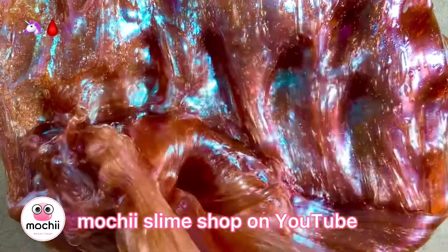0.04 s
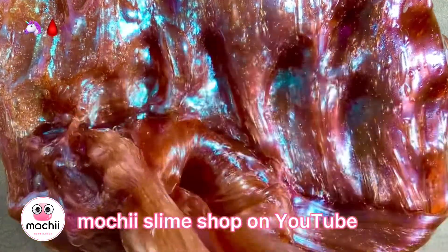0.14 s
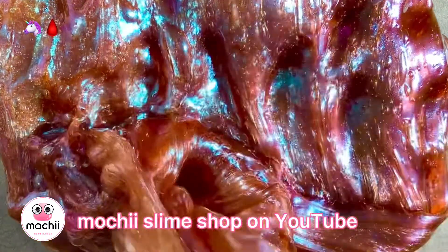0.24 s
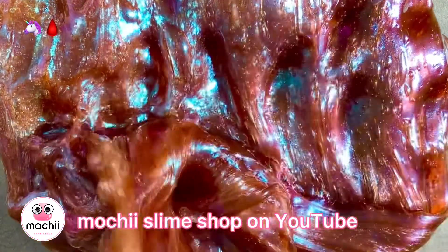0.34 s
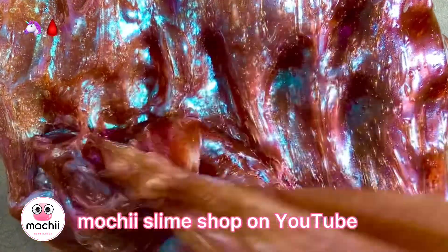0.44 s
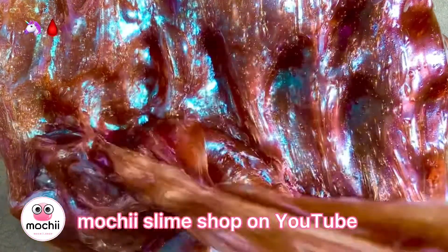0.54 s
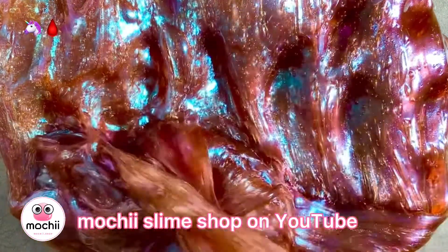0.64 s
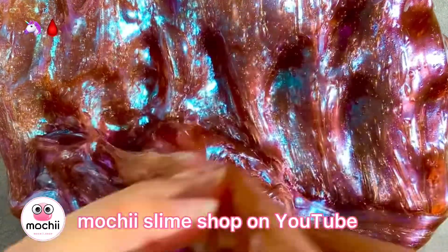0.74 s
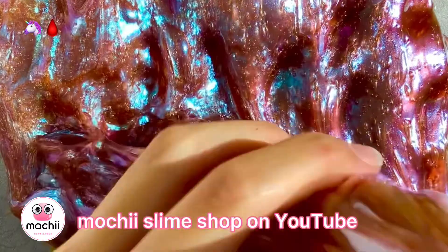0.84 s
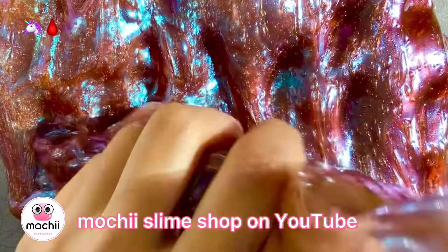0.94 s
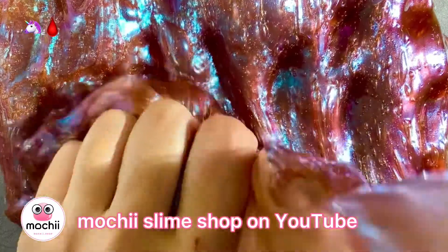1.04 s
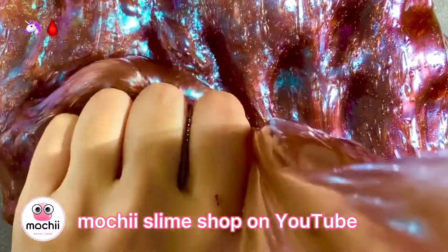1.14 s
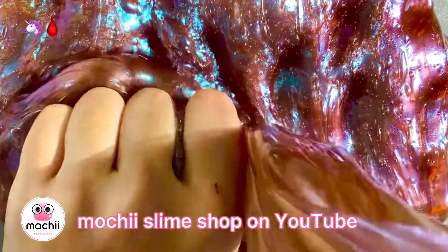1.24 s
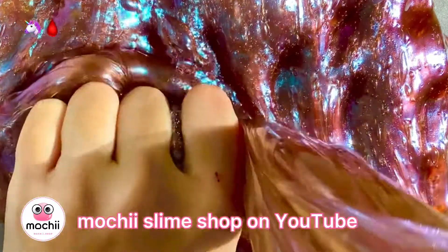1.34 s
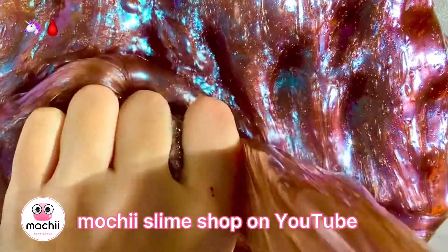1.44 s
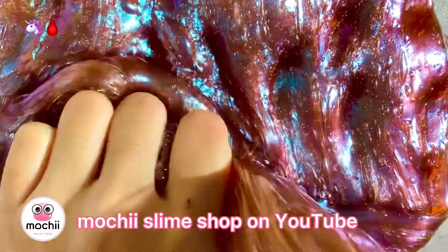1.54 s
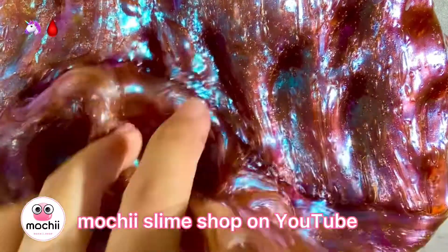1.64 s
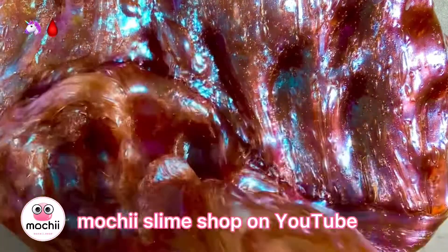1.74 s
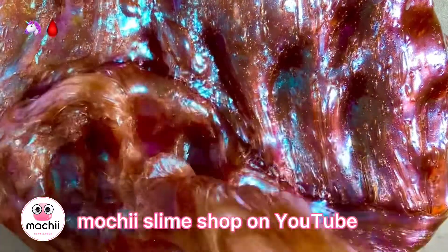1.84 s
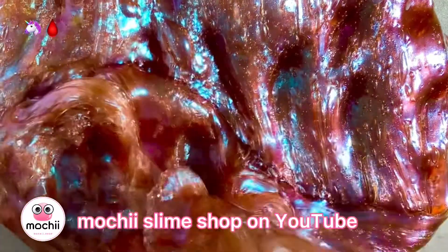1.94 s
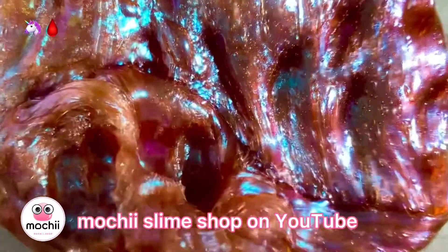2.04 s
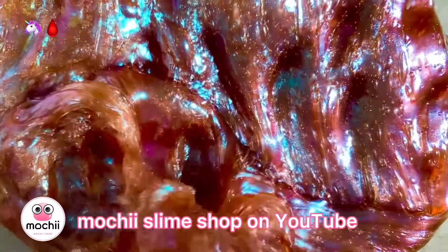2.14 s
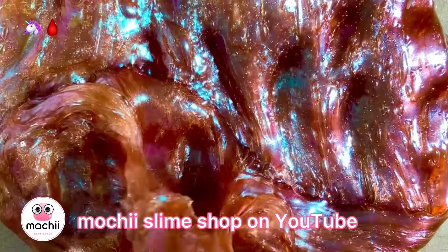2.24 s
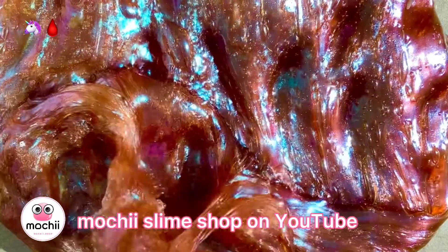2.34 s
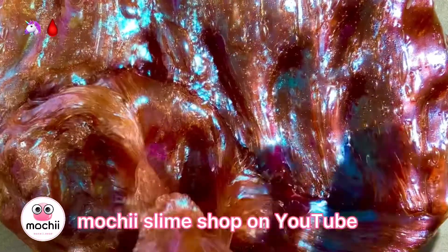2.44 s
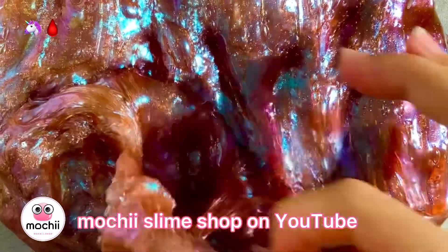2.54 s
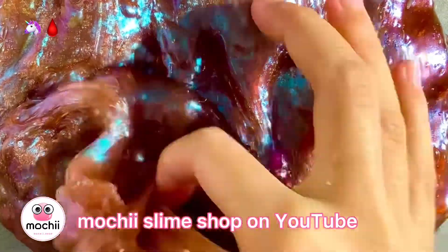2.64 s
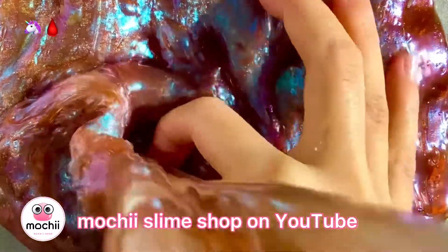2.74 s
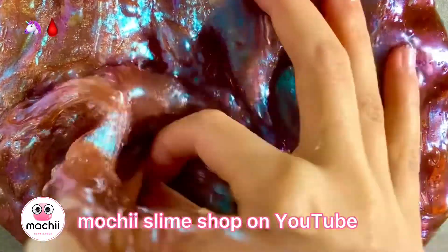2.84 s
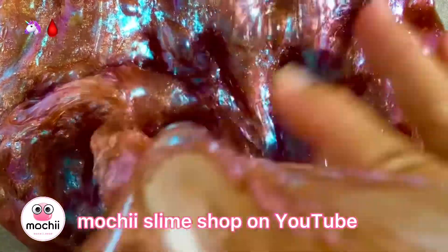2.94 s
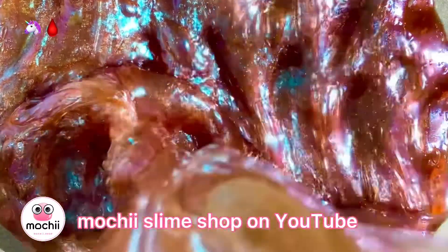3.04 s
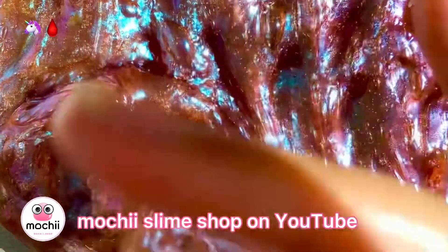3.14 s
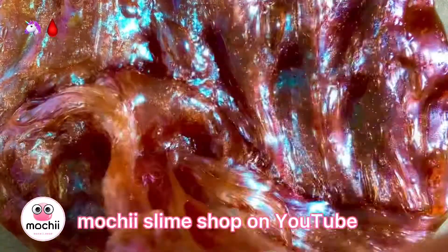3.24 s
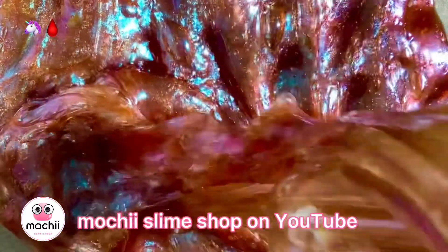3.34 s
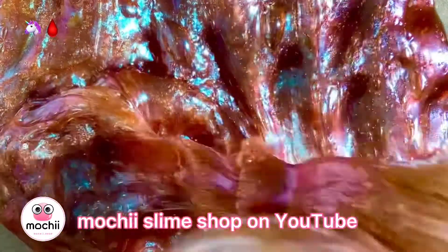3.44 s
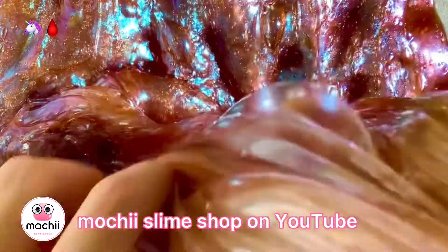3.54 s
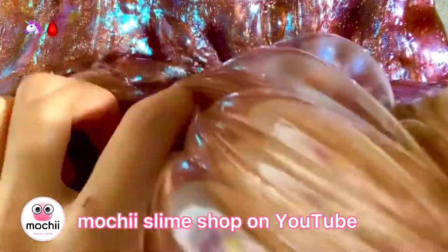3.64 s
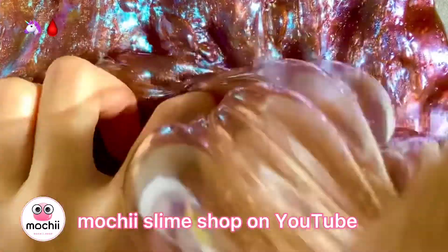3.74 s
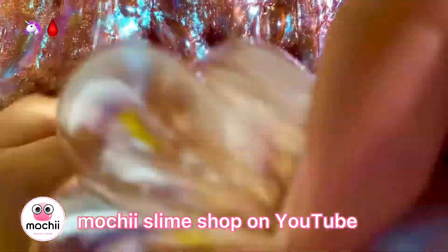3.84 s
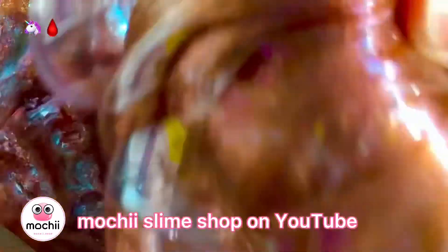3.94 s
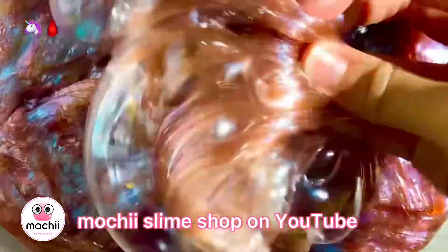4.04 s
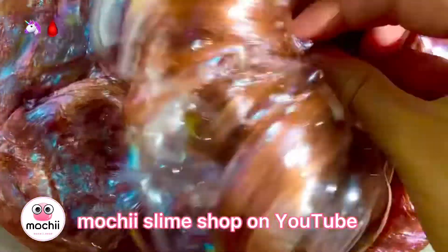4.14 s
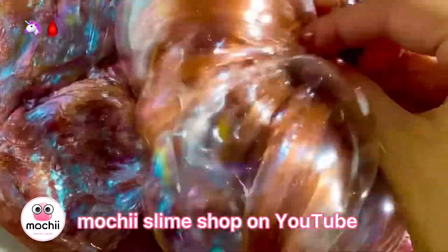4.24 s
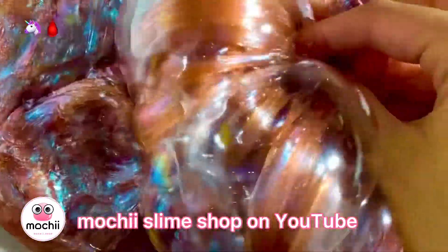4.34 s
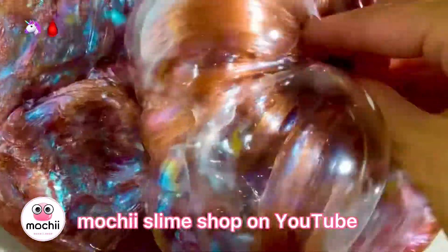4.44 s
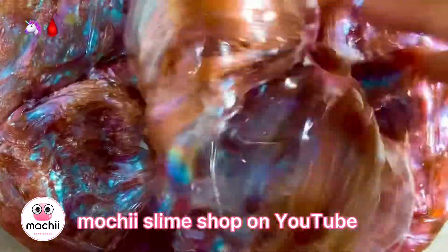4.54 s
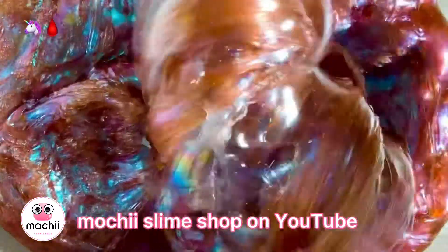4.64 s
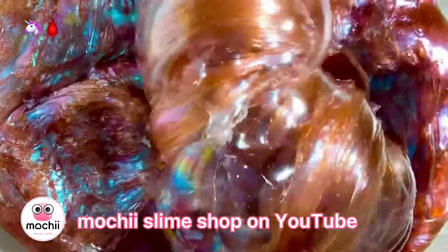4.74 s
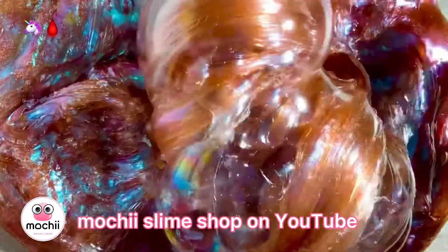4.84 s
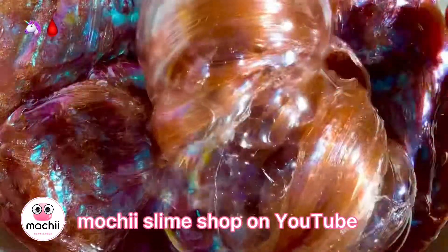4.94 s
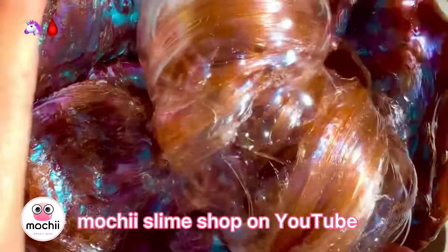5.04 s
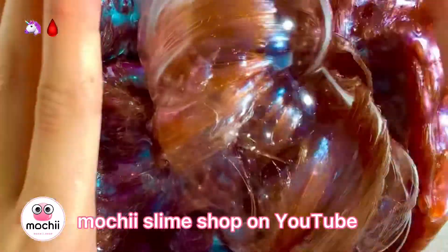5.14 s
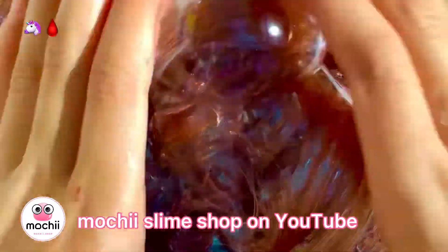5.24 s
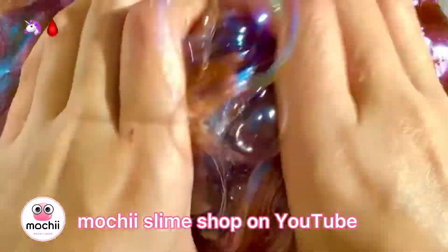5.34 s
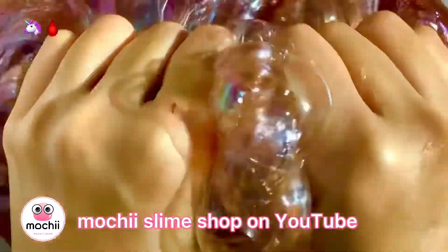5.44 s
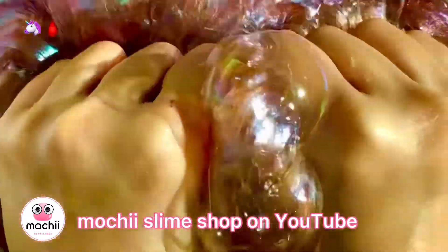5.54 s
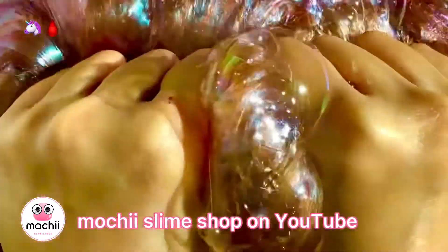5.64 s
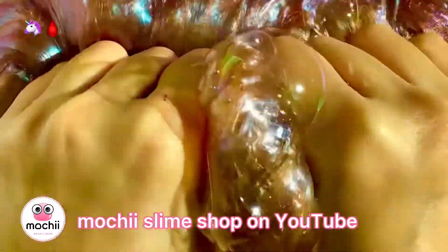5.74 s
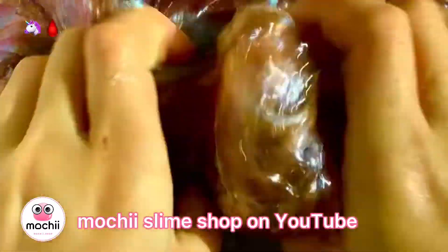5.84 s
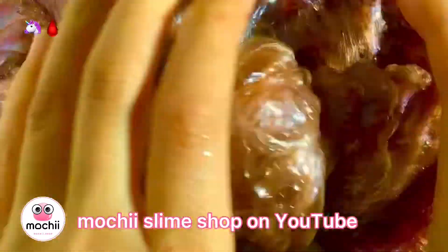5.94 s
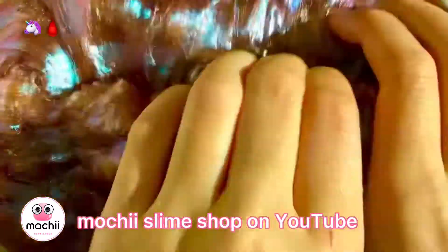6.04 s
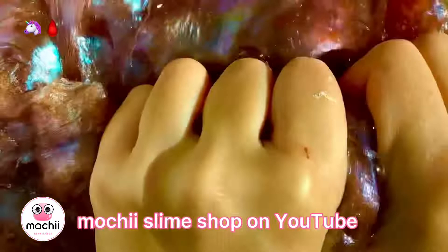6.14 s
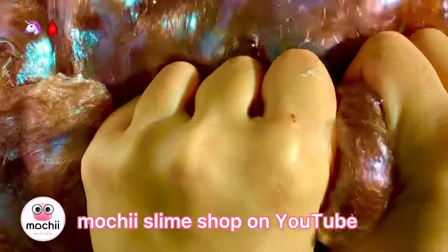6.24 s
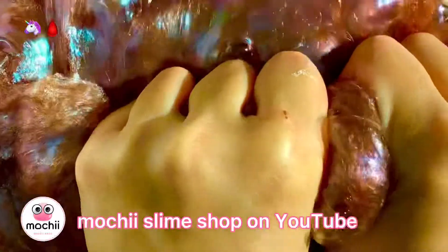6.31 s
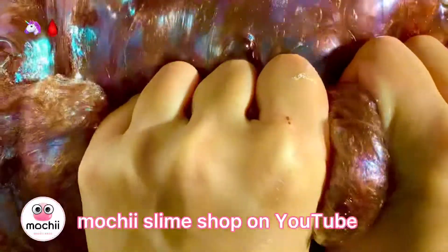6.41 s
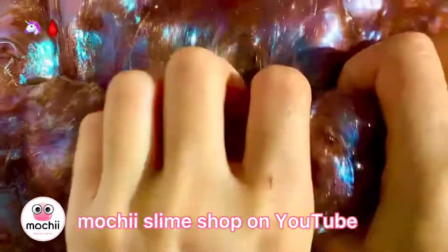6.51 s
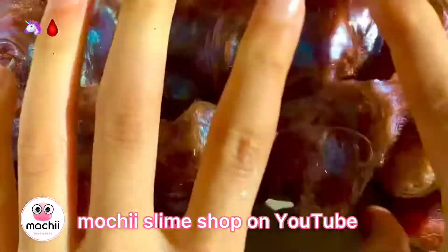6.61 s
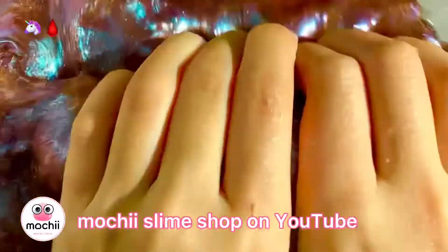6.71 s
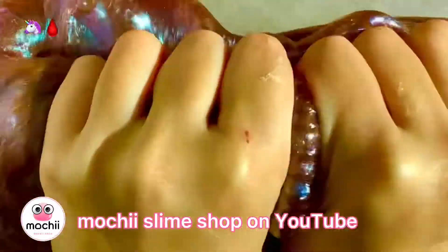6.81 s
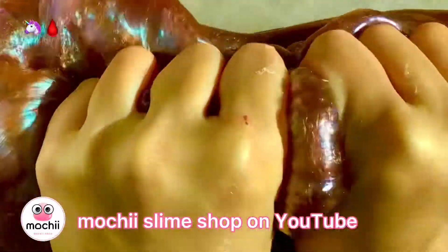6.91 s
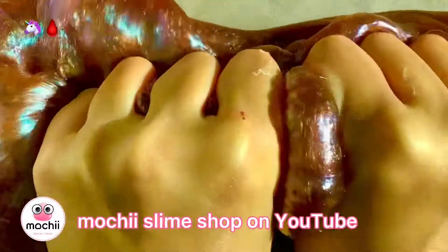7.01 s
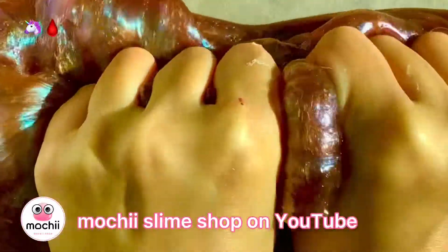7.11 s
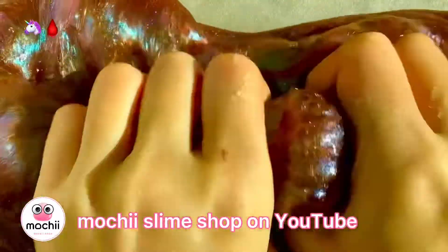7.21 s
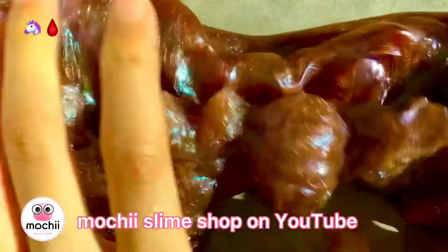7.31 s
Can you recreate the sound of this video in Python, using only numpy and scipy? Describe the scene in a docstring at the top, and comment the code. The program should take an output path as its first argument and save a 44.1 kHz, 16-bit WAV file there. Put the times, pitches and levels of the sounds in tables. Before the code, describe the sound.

Sticky slime full of trapped air is poked, stretched and pressed. Pops are short, bright and dry-edged with tiny wet rings; closing finger holes give deeper gulping plops. Sparse at first, the sounds gather midway and then erupt in three tight crackling bursts with squelch beneath. Close, detailed, centred sound with a very slight small-room reflection and low background hiss and rumble.

```python
"""Air pockets burst with short pops as hands press, poke and pull sticky slime in a quiet small room.
Each pop is a noisy snap with a quickly fading ring; holes left by fingers close with low, ringing plops.
Film peeling off skin is a crackle of tiny rings and noise that follows each press and pull.
Echoes, filtered noise for room hiss and a fuzzy hum surround it; both channels carry one microphone."""
import sys
import numpy as np
from scipy import signal
from scipy.fft import rfft, irfft
from scipy.io import wavfile
from scipy.ndimage import uniform_filter1d

SR = 44100
rng = np.random.default_rng(int(sys.argv[2]) if len(sys.argv) > 2 else 0)


def generate_wav(sig):
    """Save sig (samples, or channels by samples) to the path in sys.argv[1] as 16-bit PCM at SR."""
    pcm = np.round(np.clip(np.atleast_2d(sig).T, -1, 1) * 32767).astype(np.int16)
    wavfile.write(sys.argv[1], SR, pcm)


N = 325017  # length in samples


def gain_of(db):
    """Turns decibels into a gain."""
    return 10 ** (np.asarray(db) / 20)


def evened(x):
    """Scales to rms 1."""
    return x / np.sqrt(np.mean(x ** 2) + 1e-20)


def peaked(x):
    """Scales to peak 1."""
    return x / np.abs(x).max()


def smoothed_twice(x, size):
    """Takes a moving average twice, leaving only slow changes."""
    return uniform_filter1d(uniform_filter1d(x, size=size), size=size)


def colour(x, points):
    """Filters by a spectrum of (Hz, dB) points."""
    hz, db = np.transpose(points)
    at = np.fft.rfftfreq(len(x), 1 / SR)
    shape_db = np.interp(np.log(at + 1), np.log(hz + 1), db)
    return irfft(rfft(x) * gain_of(shape_db), len(x))


def add(mix, peak_s, sound):
    """Mixes a sound in with its peak at the given time."""
    part = mix[round(peak_s * SR) - np.abs(sound).argmax():][:len(sound)]
    part += sound[:len(part)]


def ring(hz, cycles, sag, rise):
    """A damped air pocket whose pitch sags to hz as the soft walls relax; fade and rise are in cycles."""
    u = np.arange(1, int(SR / hz * cycles * 6) + 8) * hz / SR  # time in cycles
    turns = u + sag * cycles * (1 - np.exp(-u / cycles))
    swell = 1 - np.exp(-(u / rise) ** 2)
    return peaked(np.sin(2 * np.pi * turns) * swell * np.exp(-u / cycles))


def pops():
    """The film creaks faintly and snaps; the opened pocket rings briefly and slumps with a falling gulp."""
    # bursting air pockets: (peak_s, ring_peak_db, ring_pitch_hz, snap_peak_db)
    pop_table = [(0.2027, -46, 6270, -17.5), (0.2408, -34, 4500, -25.5), (0.8115, -37.5, 4600, -21),
                 (0.9637, -39.5, 4000, -23.5), (1.0635, -28.5, 4830, -20), (1.1049, -33, 3020, -26),
                 (1.1188, -24.5, 2780, -16.5), (1.1224, -16, 2040, -10), (1.1419, -42, 2610, -16.5),
                 (1.1598, -29, 2700, -18), (1.2028, -23, 6000, -13.5), (1.2087, -9, 4940, -13),
                 (1.2442, -23.5, 4650, -21), (1.2676, -24.5, 5240, -17), (1.2884, -16, 4600, -11),
                 (1.4193, -31, 5100, -27), (1.5383, -34, 3295, -30), (1.5868, -32.5, 4040, -40),
                 (2.025, -31.5, 1720, -45.5), (2.6945, -35.0, 4570, -41), (2.7805, -31, 4330, -21.5),
                 (2.9354, -28, 3720, -27.0), (3.365, -36.5, 3880, -36.5), (3.5217, -24.5, 4300, -14),
                 (3.767, -33, 3450, -39.5), (3.7765, -35.5, 4280, -23), (3.7981, -21, 4910, -7.5),
                 (3.8626, -28.5, 5680, -24.0), (4.0504, -25.0, 3094, -24), (4.11, -37, 3430, -26.5),
                 (4.1348, -26, 2380, -40), (4.1387, -23.5, 2700, -17.5), (4.1427, -30, 3290, -21),
                 (4.1694, -25.5, 4630, -40.5), (4.1825, -4.5, 3105, -14), (4.243, -22, 4320, -15.5),
                 (4.9686, -37, 5700, -39), (5.0691, -38.5, 5750, -59), (5.3608, -21, 5180, -15),
                 (5.3648, -13, 3790, -21), (5.4007, -9, 2630, -19.0), (5.4055, -3.5, 3670, -16),
                 (5.4153, -15, 3840, -5.5), (5.4198, -11, 3820, -13), (5.437, -10, 3700, -13.5),
                 (5.4409, -13.5, 3640, -11), (5.4538, -13, 5200, -10), (5.4576, -15, 4200, -10),
                 (5.4636, -12, 4650, -1.5), (5.4683, -14, 5130, -13.5), (5.4847, -8.5, 3670, -10),
                 (5.4941, -14, 5240, -7), (5.5077, -28.5, 5700, -7.5), (5.5141, -27, 5300, -5),
                 (5.524, -20, 3480, -14), (5.5288, -9, 4930, -17), (5.547, -8.5, 5300, -5),
                 (5.5606, -16.5, 4830, -9), (5.5741, -15.5, 4380, -15), (5.5795, -11, 5700, 5),
                 (5.5947, -15, 5370, -7.0), (5.6144, -18.5, 5170, -1.5), (5.6279, -10, 4330, -3.5),
                 (5.6384, -7.5, 5530, -19), (5.6501, -13.5, 6610, -0.5), (6.0492, -24.5, 2880, -20.5),
                 (6.058, -18, 3420, -13), (6.0794, -8, 5140, -17), (6.0833, -7.5, 4000, -15),
                 (6.0986, -2, 3880, -18), (6.1121, -14.5, 2840, -9), (6.1235, -13, 4280, -11.0),
                 (6.132, -5.5, 3560, -4.5), (6.1434, -15, 5500, 2), (6.1582, -13, 3880, -8),
                 (6.1691, -9, 4550, -3.5), (6.173, -33, 4030, -3), (6.1891, -2, 3830, -6),
                 (6.2086, -13.5, 5400, -3), (6.2291, -12, 3610, -3), (6.2429, -22, 4700, -16),
                 (6.2555, -12.5, 5500, 1.5), (6.2766, -27, 5600, -8), (6.293, -11, 3460, -0.5),
                 (6.3177, -7.5, 4570, -7.5), (6.3274, -16, 6150, 0.5), (6.683, -39.5, 2650, -38),
                 (6.694, -31, 2040, -41), (6.733, -36, 3000, -43), (6.7669, -15, 3760, -20),
                 (6.8034, -16, 5670, -6), (6.8144, -19, 3040, -18), (6.835, -14.5, 4270, -8),
                 (6.8585, -6, 4130, -17.5), (6.8805, -20, 5160, -8), (6.8919, -12.5, 5200, -30),
                 (6.9027, -18, 5000, -7), (6.9163, -6, 3980, -8.5), (6.9341, -16, 4880, -3.5),
                 (6.9526, -22, 5010, -8), (6.9613, -14.5, 4580, -14), (6.9663, -18.0, 6200, -6.5),
                 (6.9829, -9.5, 5450, -24.5), (7.0128, -16, 5550, -21), (7.0203, -11, 4270, -6)]
    out, t = np.zeros(N), np.arange(-500, 500) / SR
    high = signal.butter(4, 7000, "high", fs=SR, output="sos")
    creak = np.exp(-abs(t) / np.where(t < 0, 0.0012, 0.002))
    tear = np.exp(-abs(t) / np.where(t < 0, 0.00015, 0.0003)) + 0.11 * creak
    after = t[t > 0]
    gulp_swell = np.sqrt(after / 0.0011) * np.exp(-(after / 0.0027) ** 2)
    for peak_s, ring_db, hz, snap_db in pop_table:
        snap_noise, tear_noise = rng.standard_normal((2, len(t)))
        fade_draw, phase_draw = rng.random(2)
        body = ring(hz, cycles=.3 + .5 * fade_draw, sag=.5, rise=.3)
        # small tears ring the same pocket
        ragged = evened(np.convolve(tear_noise ** 3, body, "same")) * creak
        gulp_turns = (1.41 + phase_draw) * np.log(1 + after * hz)  # pitch falls nearly as 1 / time
        gulp = np.sin(2 * np.pi * gulp_turns) * gulp_swell
        snap = peaked(signal.sosfilt(high, snap_noise * tear))
        level = gain_of(ring_db)
        add(out, peak_s, gain_of(snap_db) * snap)
        add(out, peak_s, level * body)
        centre = round(peak_s * SR)
        out[centre:][:len(after)] += level * gain_of(-21.5) * gulp
        out[centre - len(t) // 2:][:len(t)] += level * gain_of(-17) * ragged
    return out


def plops():
    """A closing hole swells up over about a cycle and rings low, falling in pitch."""
    # holes closing in the mass: (peak_s, peak_db, settled_pitch_hz)
    plop_table = [(1.1206, -25.5, 620), (2.0271, -10, 494), (2.0387, -29.5, 149), (2.054, -35.5, 640),
                  (2.063, -34, 83.5), (2.085, -35.5, 644), (2.086, -38, 76), (2.219, -45, 238),
                  (2.399, -47, 182), (3.801, -38, 527), (3.976, -49, 200), (3.998, -38.5, 182),
                  (4.011, -35.5, 148), (4.053, -30, 350), (4.0679, -25.5, 547), (4.1398, -27, 560),
                  (4.15, -29, 607), (4.1724, -27, 794), (4.1832, -22.5, 800), (5.375, -27, 466),
                  (5.4014, -12, 756), (5.4098, -21.5, 338), (5.479, -18.5, 615), (5.821, -27.5, 536),
                  (6.0583, -36, 383), (6.1135, -17.5, 483), (6.1901, -25.5, 377), (6.81, -30.5, 352),
                  (6.9182, -23.5, 680), (6.9646, -36, 402), (6.9845, -38, 660), (7.207, -33, 484)]
    out = np.zeros(N)
    for peak_s, level_db, hz in plop_table:
        add(out, peak_s, gain_of(level_db) * ring(hz, cycles=0.55, sag=0.7, rise=1.2))
    return out


def peel():
    """Film lets go of skin in fits and starts; the duller squelch of the mass follows less steeply."""
    # colour of the crackle: (pitch_hz, relative level_db per Hz)
    crackle_colour = [(710, -15.5), (1200, -12.5), (1660, -14.5), (2450, -8.5), (3470, -11.5), (5350, -6),
                      (12900, -6.5), (16000, -14)]
    db = handling_db(np.arange(N) / SR)
    ticks = grains(1500, 12000, per_s=2800, spread_db=-1.0, cycles=0.33, count=16)
    bursts = grains(1500, 14000, per_s=300, spread_db=3.0, cycles=1.2, count=16)
    fits = gain_of(2.5 * evened(smoothed_twice(rng.standard_normal(N), size=150)))
    raw = ticks + 0.45 * bursts + 0.5 * rng.standard_normal(N)
    crackle = evened(fits * colour(patchy(raw, depth_db=3.0), crackle_colour))
    squelch = grains(200, 890, per_s=750, spread_db=-1.0, cycles=0.48, count=10)
    return crackle * gain_of(db) + squelch * gain_of(0.86 * db - 13.0)


def handling_db(t):
    """Crackle level from all presses and pulls, summed in power over the resting slime."""
    # hands pressing in; crackle sets in at once and sags while held: (start_s, length_s, level_db)
    press_table = [(1.12, 0.45, -52.5), (2.863, 0.085, -55), (3.186, 0.17, -58.5), (3.82, 0.083, -52.5),
                   (4.047, 0.046, -46), (4.135, 0.14, -45), (5.392, 0.206, -26.5), (5.653, 0.056, -41),
                   (6.077, 0.33, -27.5), (6.851, 0.25, -36.5)]
    # film drawn off skin, swelling and fading in one arch: (middle_s, length_s, level_db)
    pull_table = [(0.504, 1, -73.5), (1.026, 0.8, -63), (1.611, 0.21, -50), (2.339, 0.044, -56.5),
                  (2.674, 0.85, -73), (3.532, 0.77, -68), (4.509, 0.16, -47.5), (5.834, 0.23, -40),
                  (6.525, 0.14, -40), (6.816, 0.41, -48), (7.24, 0.14, -39.5)]
    rest_db, arch_db = -80, 20.5  # level of slime left alone; drop at the ends of a pull
    attack_db_per_s, sag_db_per_s = 2499, 77
    release_db_per_s, let_go_db_per_s = 256, 597  # extra fall after a press; after a film comes free
    power = gain_of(2 * rest_db) * np.ones(len(t))  # doubling the dB squares the gain into power
    for start_s, length_s, db in press_table:
        since = t - start_s
        drop = attack_db_per_s * np.maximum(-since, 0) + sag_db_per_s * np.maximum(since, 0)
        release = release_db_per_s * np.maximum(since - length_s, 0)
        power += gain_of(2 * (db - drop - release))
    for middle_s, length_s, db in pull_table:
        free = np.maximum(t - middle_s - length_s / 2, 0)
        arch = arch_db * (2 * (t - middle_s) / length_s) ** 2
        power += gain_of(2 * (db - arch - let_go_db_per_s * free))
    return 10 * np.log10(power)


def grains(lo_hz, hi_hz, per_s, spread_db, cycles, count):
    """Sparse tiny rings of uneven size in clumps, evened over the slow run of time."""
    clump = gain_of(4.03 * evened(uniform_filter1d(rng.standard_normal(N), size=300)))
    size = gain_of(spread_db * np.minimum(rng.exponential(1, N), 4))
    hits = size * (rng.random(N) < per_s / SR) * clump * rng.choice([-1, 1], N)
    kind = rng.integers(0, count, N)  # which pitch each grain takes
    out = np.zeros(N)
    for k, hz in enumerate(np.geomspace(lo_hz, hi_hz, count)):
        grain = ring(hz, cycles, sag=0.79, rise=0.15)
        out += signal.oaconvolve(hits * (kind == k), grain)[:N]
    return out / np.sqrt(uniform_filter1d(out ** 2, size=3000) + 1e-12)


def patchy(x, depth_db):
    """Folds open and close, so broad resonances drift over the sound."""
    z = signal.stft(x, nperseg=256)[2]
    field = uniform_filter1d(rng.standard_normal(z.shape), size=8, axis=0)  # smooth over pitch
    field = uniform_filter1d(field, size=16, axis=1)  # smooth over time
    return signal.istft(z * gain_of(depth_db * evened(field)), nperseg=256)[1][:N]


def room(x):
    """Folds of slime and table scatter at once; walls leave a faint tail, weak in the bass and the top."""
    t = np.arange(SR // 2) / SR
    taps = rng.choice([-1., 1.], len(t)) * (rng.random(len(t)) < .08) * (t > .001)  # random echoes
    near = signal.lfilter(*signal.butter(2, 900, "high", fs=SR), taps * gain_of(-60 * t / 0.03))
    far = colour(taps, [(1000, -17.5), (2100, -1), (9000, -9)]) * gain_of(-60 * t / 1.0)
    near = gain_of(-10.5) * near / np.linalg.norm(near)
    far = gain_of(-20.5) * far / np.linalg.norm(far)
    return signal.oaconvolve(x, near + far)[:N]


def room_tone():
    """Hiss and rumble, with a fuzzy hum line; the low end swells and sinks unevenly."""
    # colour of the room noise: (pitch_hz, relative level_db per Hz)
    room_colour = [(30, -19), (80, 6), (175, -5.5), (301, -14.5), (775, -21), (1040, -24.5), (5730, -33),
                   (16000, -36.5)]
    # wavering hum: (pitch_hz, width_hz, level_db)
    hum_table = [(177, 17, -70.5)]
    out = gain_of(-64.5) * evened(colour(rng.standard_normal(N), room_colour))
    at = np.fft.rfftfreq(N, 1 / SR)
    for hz, width_hz, db in hum_table:
        line = rfft(rng.standard_normal(N)) / (1 + (2 * (at - hz) / width_hz) ** 2)
        out += gain_of(db) * evened(irfft(line, N))
    low = irfft(rfft(out) / (1 + (at / 140) ** 4), N)
    swell = evened(smoothed_twice(rng.standard_normal(N), size=4000))
    return out + low * (gain_of(1.4 * swell - 3.5) - 1)


def scene():
    """All sounds reach one microphone, copied to two channels."""
    slime = pops() + plops()
    return np.tile(slime + room(slime) + peel() + room_tone(), (2, 1))


def record(dry):
    """The microphone dips near 6.5 kHz, fades at the top and rounds off loud peaks; then the band limit."""
    response = [(6100, 5.0), (6500, 0), (7400, 4.0), (15800, 4.5), (16300, -35.5)]  # (Hz, dB)
    soft = np.array([colour(x, response) for x in dry])
    soft = .8 * np.tanh(soft / .8)
    edge_hz = 17140
    low_pass = signal.firwin(1023, edge_hz, window=("kaiser", 11), fs=SR)
    return signal.oaconvolve(soft, low_pass[None], "same")


dry = scene()
out = record(dry)
generate_wav(out)
```